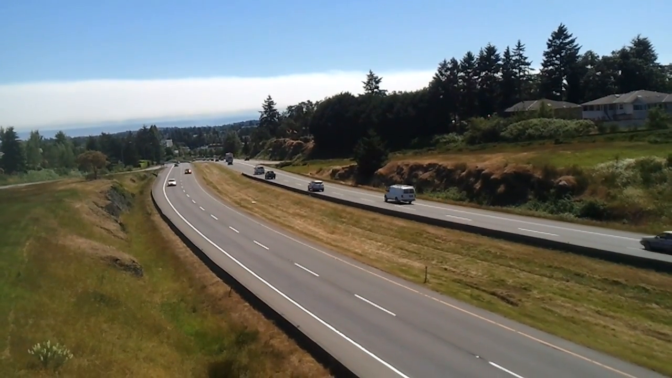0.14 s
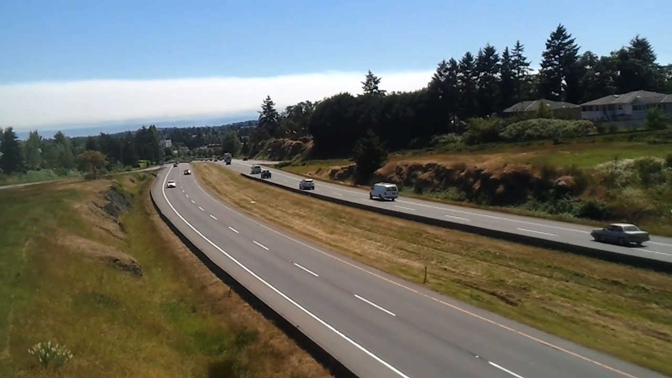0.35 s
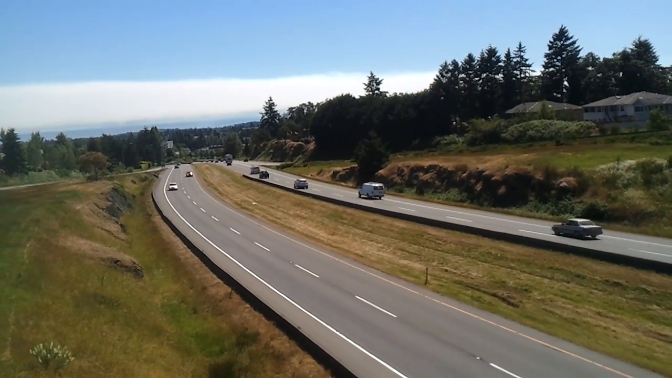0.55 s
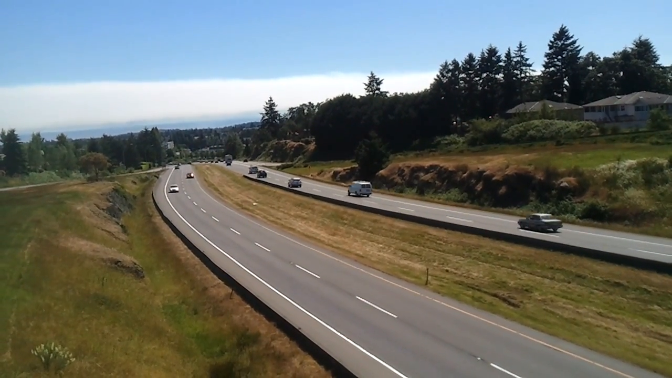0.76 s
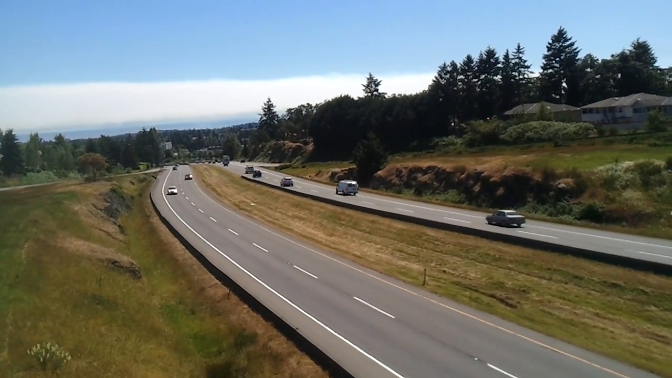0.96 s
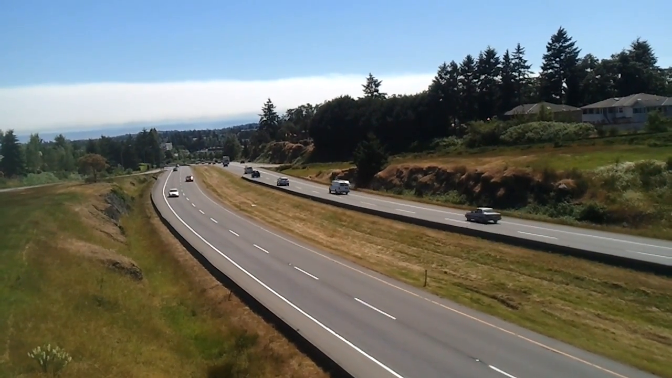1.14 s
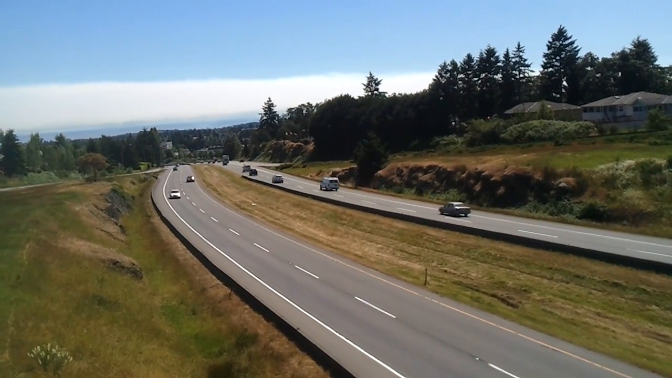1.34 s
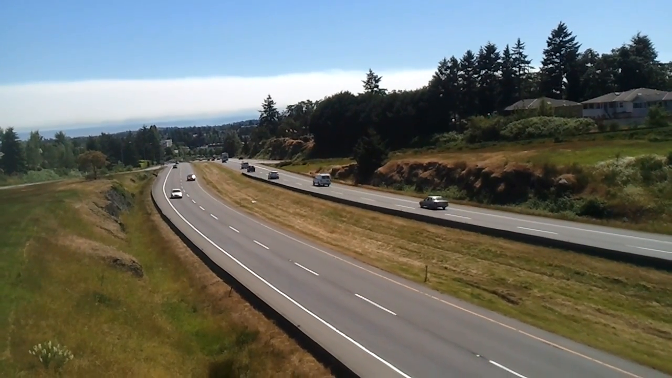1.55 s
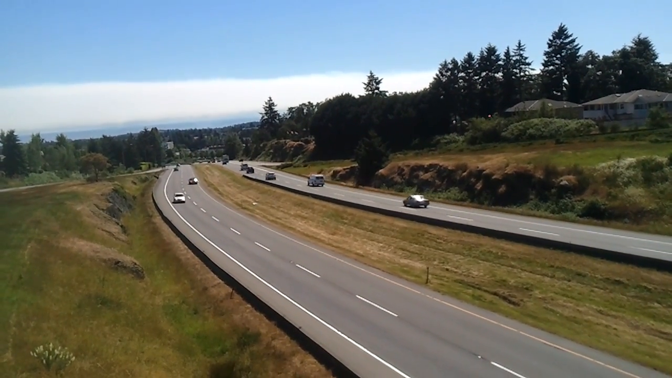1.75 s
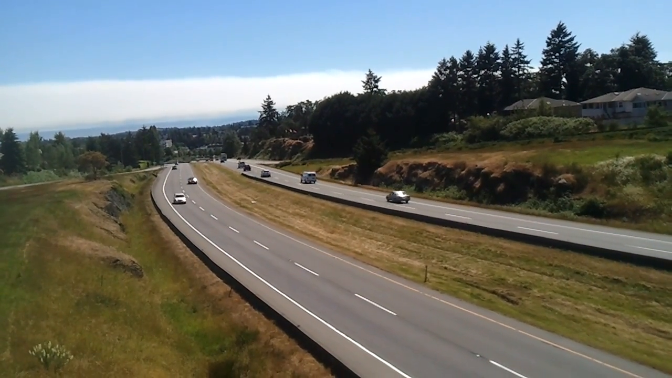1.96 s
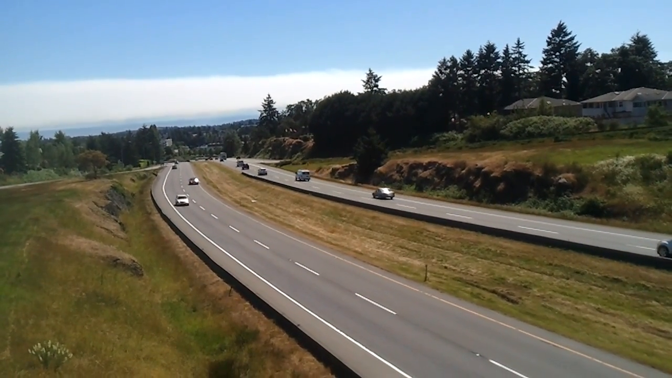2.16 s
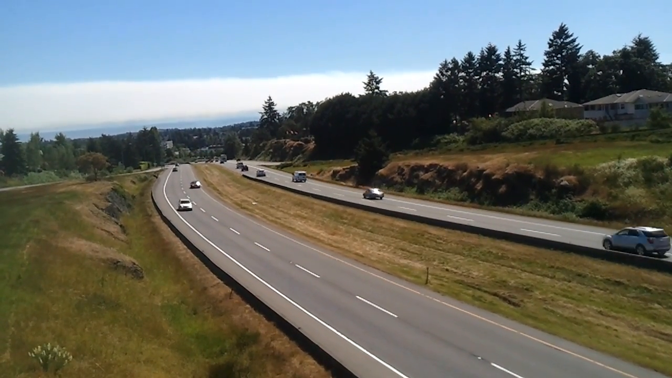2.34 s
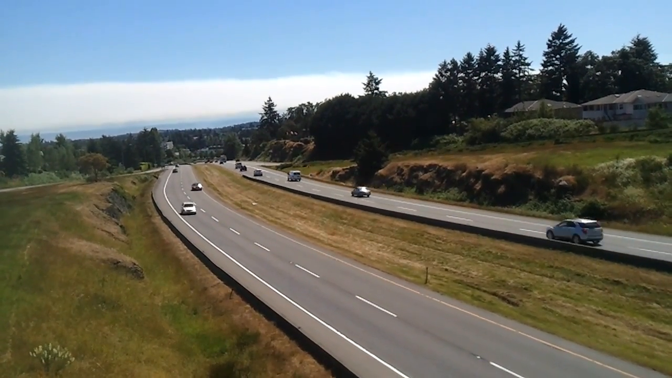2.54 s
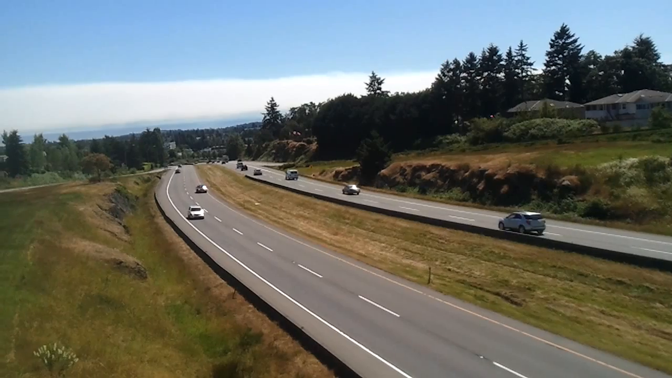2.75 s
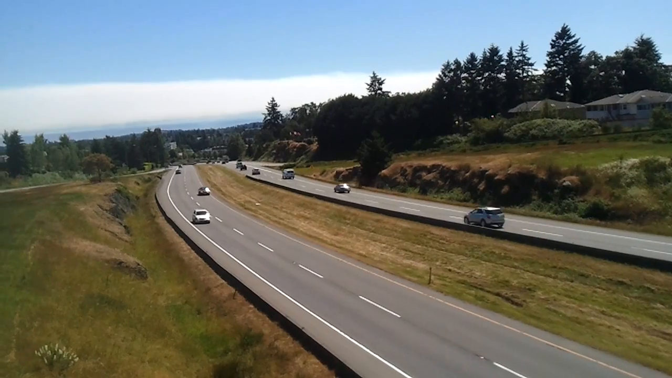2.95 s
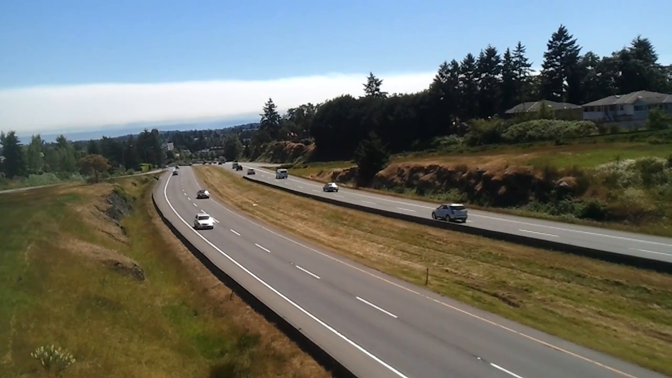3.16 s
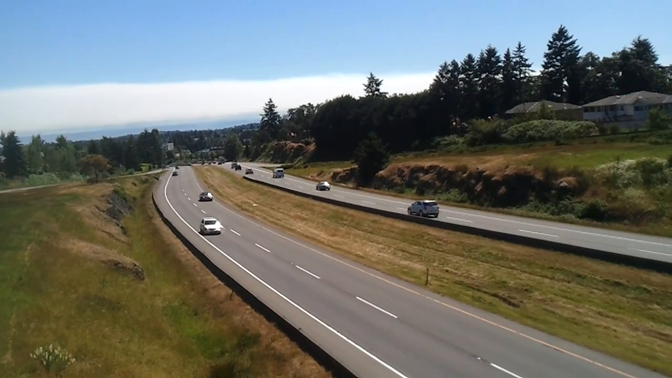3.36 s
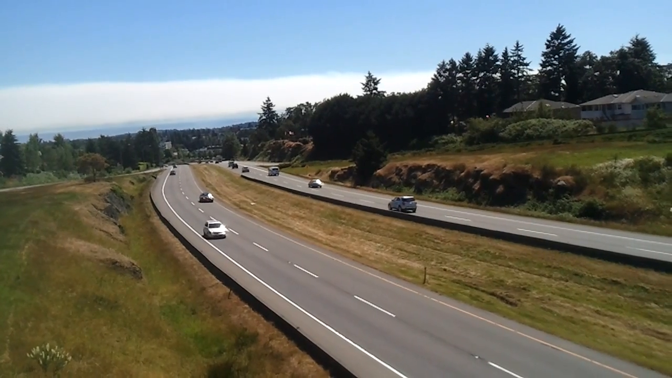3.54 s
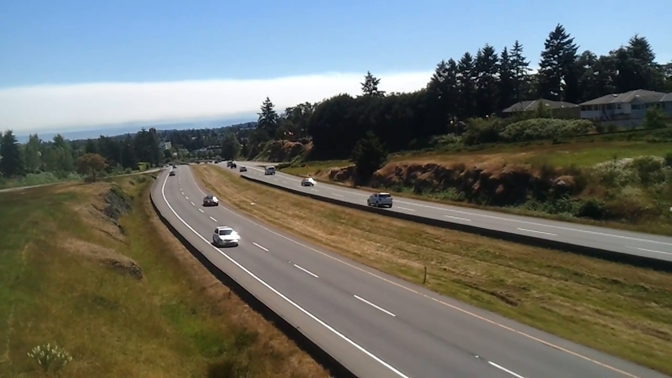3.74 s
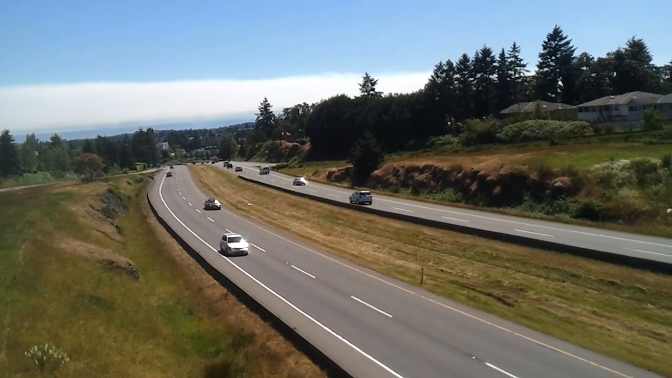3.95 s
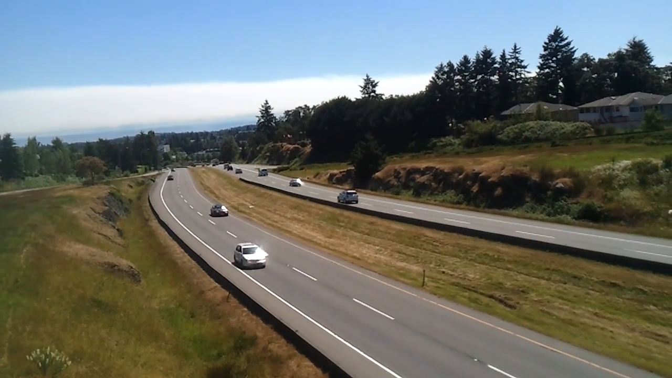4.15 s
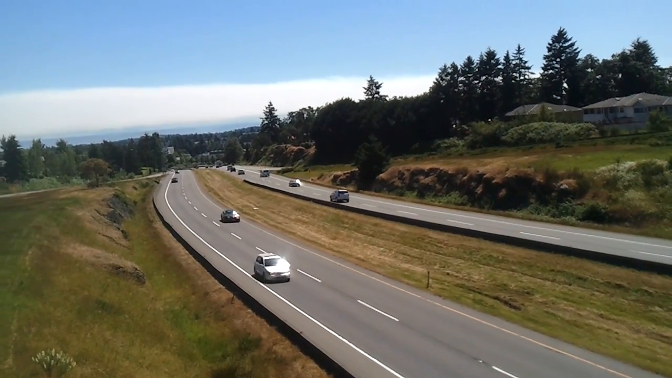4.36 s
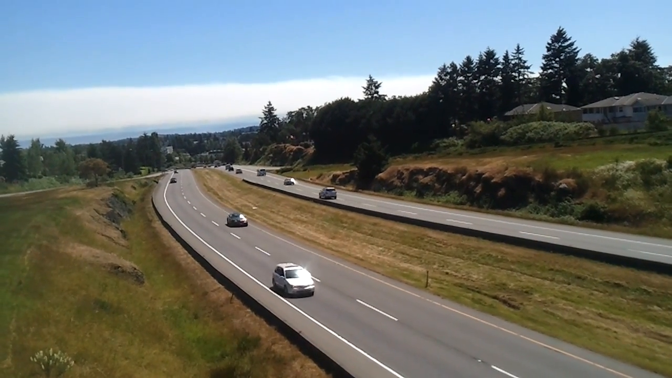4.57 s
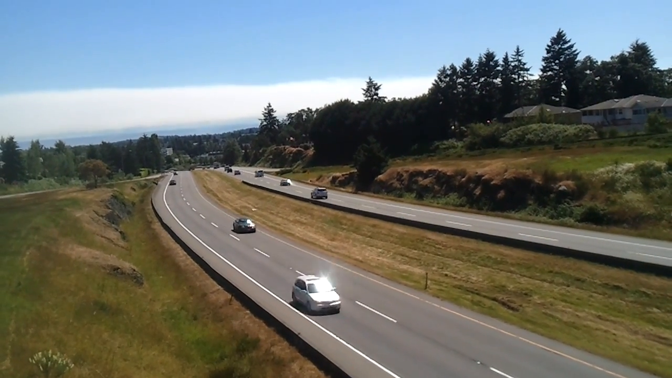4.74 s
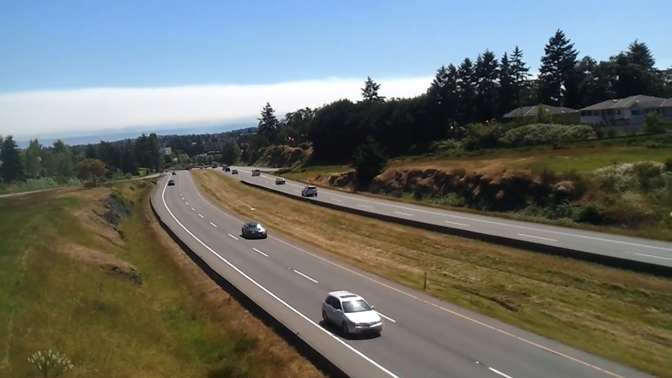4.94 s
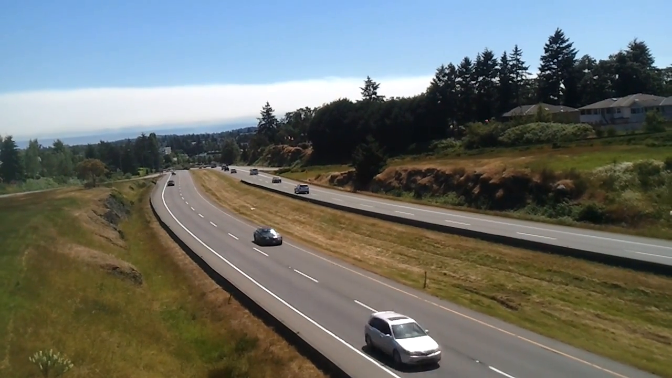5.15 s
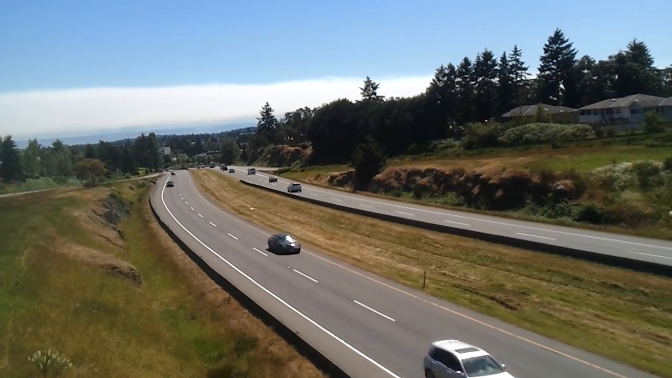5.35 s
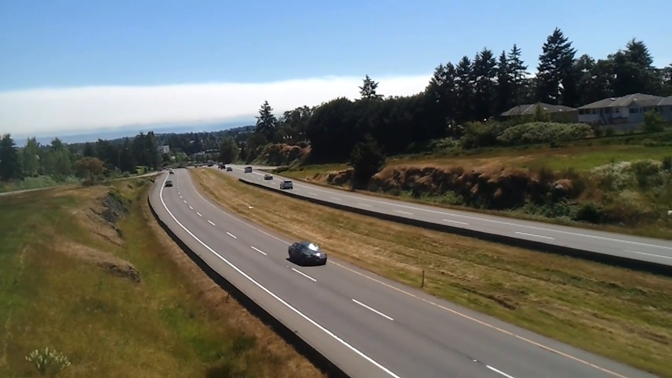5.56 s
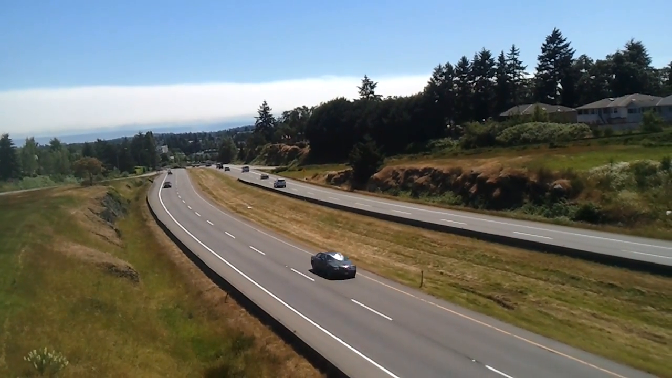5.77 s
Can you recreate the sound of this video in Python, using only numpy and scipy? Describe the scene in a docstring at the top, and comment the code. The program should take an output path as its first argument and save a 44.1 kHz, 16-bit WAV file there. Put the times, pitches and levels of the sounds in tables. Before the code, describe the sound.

Heard from a bridge above a highway, distant tyres blend into a steady rush while wind hits a small microphone in low, irregular puffs. About halfway through, nearer traffic grows louder and the wind buffets harder and more often. Towards the end a car comes close with a roaring, slightly howling tyre sound, and the strongest gusts briefly overload the microphone.

```python
"""Highway traffic heard from a bridge on a breezy day, through a small microphone.
From the start, far tyres merge into a steady rush under faint hisses, and eddies strike in low puffs.
After three seconds the near lanes take over and the freshening wind buffets harder and more often.
Towards the end a car comes close, its tread howling, and the strongest puffs overload the microphone."""
import sys
import numpy as np
from scipy import signal
from scipy.fft import rfft, irfft
from scipy.io import wavfile
from scipy.ndimage import uniform_filter1d

SR = 44100
rng = np.random.default_rng(int(sys.argv[2]) if len(sys.argv) > 2 else 0)


def master_out(mix):
    """Clip the mix to full scale and print it as 16-bit PCM to the path in sys.argv[1]."""
    frames = np.transpose(np.atleast_2d(mix))
    ceiling = np.clip(frames, -1, 1)
    pcm = np.round(ceiling * 32767).astype(np.int16)
    wavfile.write(sys.argv[1], SR, pcm)


N = 255780
T = np.arange(N) / SR

# pressure spectrum of strong turbulence: frequency_hz, density_db
HARD_WIND_SPECTRUM = [(20, -34), (60, -15.5), (140, -1), (240, -1), (400, 0), (700, -6.5), (1000, -15),
                      (1600, -28), (4000, -48.5)]


def undb(db):
    """The decibel scale: amplitude grows tenfold every 20 dB."""
    return 10 ** (np.asarray(db) / 20)


def unit(x):
    """Normalisation to an rms of one."""
    return x / np.sqrt(np.mean(x ** 2))


def curves(table):
    """Linear interpolation of a timed table's columns, one value a sample."""
    time_s, *columns = np.transpose(table)
    return [np.interp(T, time_s, column) for column in columns]


def swell(peak_s, level_db, length_s):
    """A Gaussian envelope, its length two standard deviations."""
    return undb(level_db) * np.exp(-2 * ((T - peak_s) / length_s) ** 2)


def noise(spectrum):
    """Spectral shaping: white noise takes the given colour, at unit rms."""
    hz, db = np.transpose(spectrum)
    f = np.maximum(np.fft.rfftfreq(N, 1 / SR), 1)
    gain = undb(np.interp(np.log(f), np.log(hz), db)) * np.minimum(f / hz[0], 1)
    return unit(irfft(rfft(rng.standard_normal(N)) * gain, N))


def drift(rate_hz):
    """Low-passed noise: a smooth random fluctuation of unit rms."""
    f = np.fft.rfftfreq(N, 1 / SR)
    gain = np.exp(-(f / rate_hz) ** 2) * (f > 0)
    return unit(irfft(rfft(rng.standard_normal(N)) * gain, N))


def band(centre_hz, width_hz):
    """Random quadrature modulation spreads a tone into a narrow band of noise."""
    phase = 2 * np.pi * np.cumsum(centre_hz * np.ones(N)) / SR
    return unit(drift(width_hz) * np.cos(phase) + drift(width_hz) * np.sin(phase))


def low_pass(x, cutoff_hz):
    """An elliptic filter cuts steeply above its passband."""
    return signal.sosfilt(signal.ellip(8, .2, 70, cutoff_hz, fs=SR, output="sos"), x)


def hisses():
    """Narrow-band noise is heard as thin, high hisses that come and go."""
    # faint bands above the tyre rush: peak_s, level_db, length_s, centre_hz, width_hz
    hiss_bands = [(.4, -38, 0.03, 5000, 630), (.3, -55, 1.6, 6870, 200), (2.53, -50, .2, 5900, 400)]
    return sum(swell(*envelope) * band(hz, width_hz) for *envelope, hz, width_hz in hiss_bands)


def scintillation(x, depth_db=0.86, rate_hz=9):
    """Atmospheric scintillation: moving air lets each octave of a distant sound fade and swell alone."""
    centres = np.arange(8, 14)  # powers of two, 256 to 8192 Hz
    octave = np.log2(np.maximum(np.fft.rfftfreq(N, 1 / SR), 1))
    octave = np.clip(octave, centres[0], centres[-1])
    spectrum = rfft(x)
    parts = (irfft(spectrum * np.maximum(1 - abs(octave - c), 0), N) for c in centres)
    return sum(part * undb(depth_db * drift(rate_hz)) for part in parts)


def tyres():
    """Incoherent sources add in power: many tyres make one rush, shared between far and near lanes."""
    # tyre noise of the traffic stream: time_s, level_db, near_share
    traffic = [(0.0, -30.0, 0.47), (0.4, -30.5, 0), (1.2, -30.5, 0.07), (1.9, -30, 0.33),
               (2.25, -28.0, 0.18), (2.7, -30, 0.16), (3.0, -28.0, 0.36), (3.3, -27.0, 0.91),
               (3.9, -25.0, 1.0), (4.35, -26.0, 0.94), (4.6, -27.5, 0.77), (5.0, -26.5, 0.96),
               (5.45, -26.5, 0.96), (5.8, -23.5, 0.78)]
    # spectrum of the far lanes: frequency_hz, density_db
    far_spectrum = [(40.0, -11), (170.0, -0.5), (650.0, -3.5), (930.0, 0.5), (1430.0, -3.5), (1650.0, -6.5),
                    (1950.0, -2), (2750.0, -12.5), (3600.0, -9.5), (4500.0, -8), (4950.0, -16.0),
                    (5600.0, -26), (6500.0, -27.5), (7800.0, -34)]
    # spectrum of the near lanes: frequency_hz, density_db
    near_spectrum = [(100.0, -3), (650.0, -2.5), (1000.0, 0.5), (1450.0, 3.5), (1820.0, -6), (2200.0, 2),
                     (2900.0, -5.5), (3500.0, -13), (3950.0, -1.5), (4400.0, -6.5), (5050.0, -13),
                     (5650.0, -25), (7800.0, -35.5)]
    level_db, near_share = curves(traffic)
    far = undb(5.5) * np.sqrt(1 - near_share) * noise(far_spectrum)
    near = undb(5.0) * np.sqrt(near_share) * noise(near_spectrum)
    return scintillation(far + near) * undb(level_db)


def closest_car():
    """Uneven tread blocks howl over a broad roar; the Doppler shift falls as the car draws level."""
    # whichever car is closest: time_s, roar_db, howl_db, pitch_hz
    passage = [(0.15, -29, -34.5, 1420.0), (0.6, -41, -38.5, 1391), (1.6, -26, -40, 1431),
               (3.0, -49.5, -34, 1385), (3.7, -30, -34.5, 1510.0), (4.35, -29, -35.5, 1525),
               (4.7, -24.5, -26.5, 1553), (5.3, -21, -22.0, 1484), (5.8, -23, -26, 1458)]
    # spectrum of its tyre roar: frequency_hz, density_db
    roar_spectrum = [(500, -10), (1050, 2), (1700, 1.5), (3300, -28.5), (5000, -23), (8000, -39)]
    roar_db, howl_db, pitch_hz = curves(passage)
    return undb(roar_db) * noise(roar_spectrum) + undb(howl_db) * band(pitch_hz, width_hz=180)


def wind_strength(breeze_db=-31.5, freshen_db_per_s=1.5):
    """Superposition of flows: gusts ride on a steadily freshening breeze."""
    # gusts that swell and die away: peak_s, level_db, length_s
    gusts = [(.42, -22.5, 0.2), (1.162, -28, 0.14), (1.535, -29, .12), (2.02, -26.5, 0.21),
             (2.61, -20, 0.2), (3.11, -23, .13), (3.717, -18, 0.14), (3.955, -13, 0.099),
             (4.37, -16.5, .17), (4.932, -16.5, 0.29), (5.433, -13, 0.19)]
    return undb(breeze_db + freshen_db_per_s * T) + sum(swell(*gust) for gust in gusts)


def wind(hard_from_db=-18, transition_db=1.5, flutter_db=8):
    """Turbulence at the microphone port: a fluttering rumble that brightens with its strength."""
    # pressure spectrum of light air: frequency_hz, density_db
    light_spectrum = [(20, -30.5), (45, -16), (80, -6), (155, -0.5), (270, -0.5), (450, -10), (700, -22),
                      (1200, -30), (3000, -58)]
    flutter = np.tanh(drift(rate_hz=75) / 2)
    level_db = 20 * np.log10(wind_strength()) + flutter_db * flutter
    hard_share = 1 / (1 + np.exp((hard_from_db - level_db) / transition_db))
    light_air = undb(0.5) * np.sqrt(1 - hard_share) * noise(light_spectrum)
    hard_air = undb(-3.5) * np.sqrt(hard_share) * noise(HARD_WIND_SPECTRUM)
    return undb(level_db) * (light_air + hard_air)


def small_eddies(spacing_s=1 / 28, length_s=.005, over_wind_db=3.5, spread_db=2.6):
    """Intermittency: the envelope of lesser puffs, unevenly spaced and scaled by the wind they ride."""
    jitter, strength = rng.uniform(-0.82, 1, (260, 2)).T
    peaks_s = np.cumsum(spacing_s * (1 + .8 * jitter))
    levels_db = over_wind_db + spread_db * strength
    puffs = sum(swell(s, db, length_s) for s, db in zip(peaks_s, levels_db) if s < T[-1])
    return wind_strength() * puffs


def thump(start_s, level_db, attack_s=.003, hold_s=.0064, release_s=.0067):
    """Envelope of a pressure transient: an eddy hits, crosses the port and decays exponentially."""
    age_s = T - start_s
    tail_s = np.maximum(age_s - attack_s - hold_s, 0)
    rise = np.clip(age_s / attack_s, 0, 1)
    return undb(level_db) * rise * np.exp(-np.minimum(tail_s / release_s, 20))


def eddies():
    """The turbulent cascade: each eddy is a puff of random pressure, torn ragged by smaller whirls."""
    # the hardest eddies, which strike as single thumps: start_s, level_db
    strikes = [(0.287, -24.5), (0.359, -20), (0.405, -17), (0.444, -16.5), (0.623, -16.5), (0.681, -14.5),
               (0.843, -17), (1.044, -9.5), (1.111, -15.0), (1.158, -13), (1.344, -13), (1.368, -13.5),
               (1.484, -15.5), (1.684, -15), (1.971, -18), (2.525, -12.5), (2.608, -11), (2.654, -8.5),
               (3.118, -19.5), (3.211, -11), (3.251, -5.5), (3.38, -14.5), (3.441, -14.5), (3.551, -14),
               (3.677, -12), (3.75, -7.5), (3.788, -8.5), (3.847, -11.5), (3.95, -5.5), (4.029, -7.5),
               (4.2, -10), (4.246, -9.5), (4.278, -8.5), (4.333, -15.5), (4.437, -12.5), (4.483, -15.5),
               (4.599, -10.5), (4.723, -14.5), (4.827, -8), (4.936, -10.5), (5.052, -9.5), (5.169, -12.5),
               (5.232, -4.5), (5.291, -11), (5.372, -10), (5.412, -7), (5.497, -7), (5.524, -9.5),
               (5.766, -11)]
    pressure = noise(HARD_WIND_SPECTRUM)
    local_power = uniform_filter1d(pressure ** 2, 350)  # over about 8 ms
    even_pressure = pressure / np.sqrt(local_power + 1e-3)
    ragged = undb(2.5 * drift(rate_hz=170))
    thumps = undb(1.1) * sum(thump(*strike) for strike in strikes)
    return ragged * even_pressure * np.hypot(thumps, small_eddies())


def scene():
    """Superposition: the pressures of road and wind add at one microphone."""
    return (tyres() + closest_car() + wind() + eddies() + hisses())[None]


def record(dry, ceiling=.73, knee=10):
    """Saturation rounds the strongest puffs; the input filter's overshoot clips with a faint crackle."""
    rounded = dry / (1 + np.abs(dry / ceiling) ** knee) ** (1 / knee)
    clipped = np.clip(low_pass(rounded, cutoff_hz=7900), -.71, .71)
    return low_pass(clipped, cutoff_hz=15800)


dry = scene()
out = record(dry)
master_out(out)
```